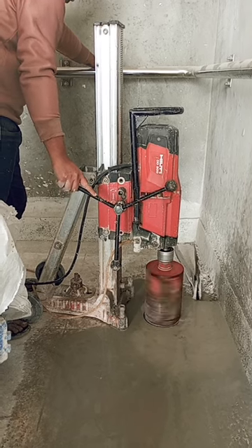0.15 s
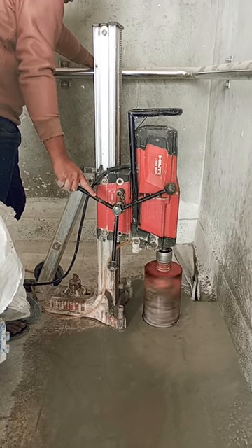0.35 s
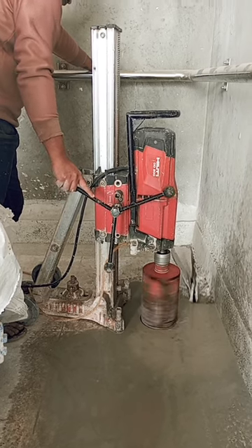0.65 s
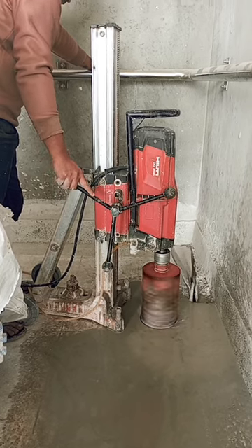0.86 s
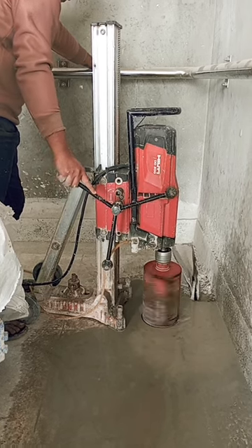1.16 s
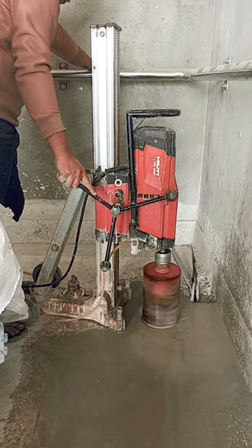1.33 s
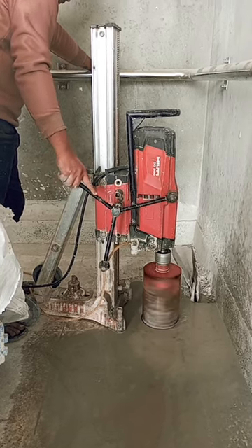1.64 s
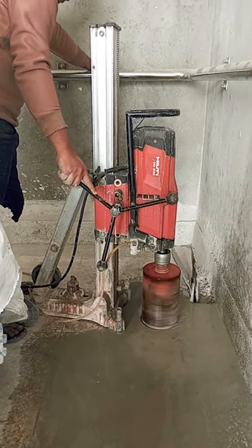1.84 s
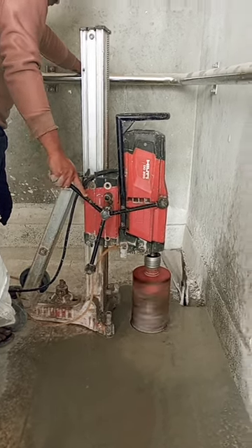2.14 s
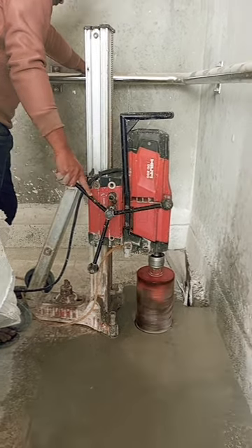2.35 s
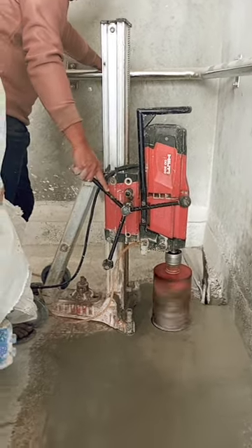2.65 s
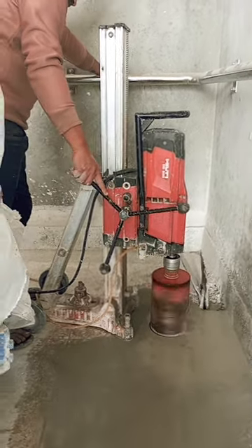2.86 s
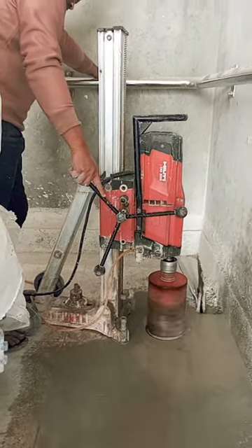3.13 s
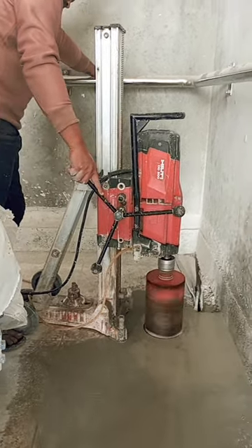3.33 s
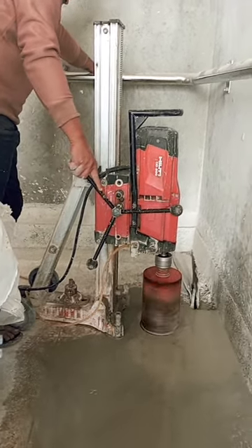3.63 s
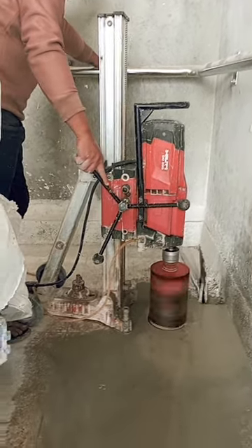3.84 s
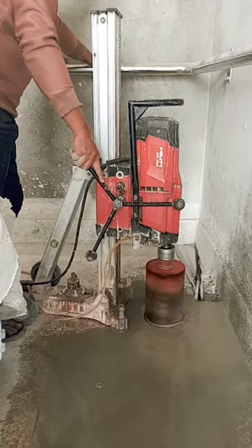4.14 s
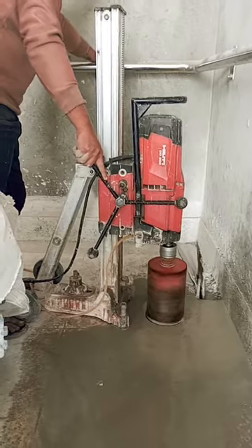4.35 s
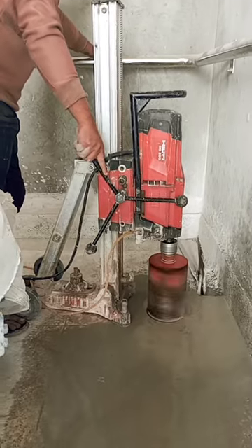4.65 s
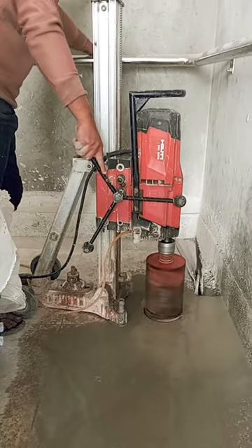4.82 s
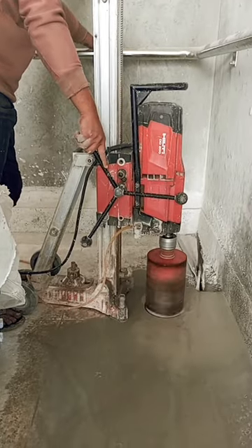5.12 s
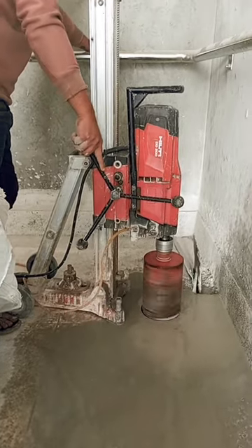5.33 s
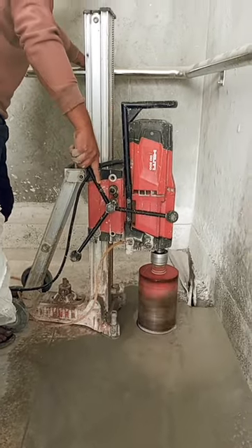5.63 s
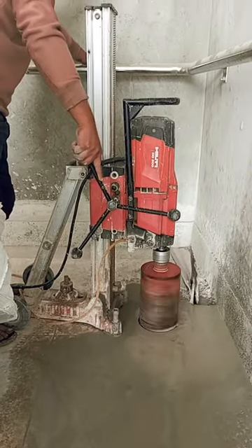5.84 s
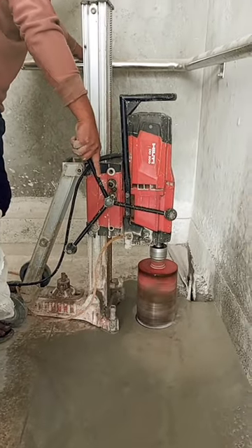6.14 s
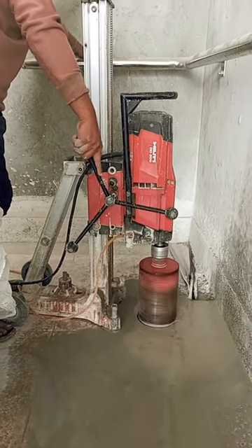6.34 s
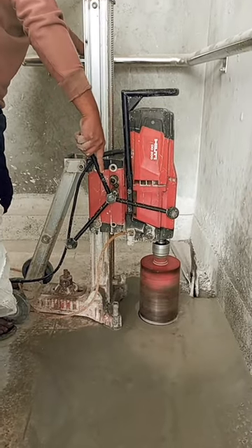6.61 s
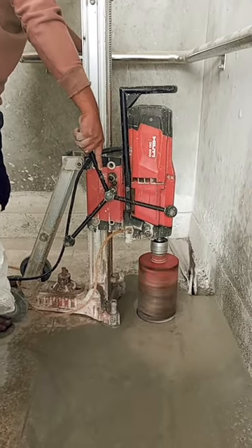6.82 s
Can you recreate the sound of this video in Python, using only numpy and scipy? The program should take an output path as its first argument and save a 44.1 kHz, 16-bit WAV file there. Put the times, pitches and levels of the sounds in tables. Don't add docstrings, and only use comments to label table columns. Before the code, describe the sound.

A core drill is already running at 0 seconds and never stops, heard very close in a small, hard concrete room. Layered gear tones and a piercing commutator whine hold nearly steady, sagging slightly about every quarter second as the bit turns past a tight spot. Beneath lie a dull grinding roar and gritty scrape; above, fan air and wet slurry hiss constantly. A sharp wind pop lands near 0.5, with scattered gusts. From about 2 seconds the high whine swells and fades irregularly between the walls. Pops return around 2.8 and 4.0, then draught thumps and fluttering puffs crowd in from 4.5 onward, especially 5.7 to 6.1. Near 5.5 the cutting presses harder, and by 6 the motor is slightly faster and higher. The scrape gradually dulls while drilling continues to the end at 7 seconds.

```python
import sys
import numpy as np
from scipy import signal
from scipy.fft import rfft, irfft
from scipy.io import wavfile
from scipy.ndimage import uniform_filter1d, minimum_filter1d, map_coordinates

SR = 44100
rng = np.random.default_rng(int(sys.argv[2]) if len(sys.argv) > 2 else 0)


def unload_audio(sound):
    columns = np.transpose(np.atleast_2d(sound))
    steps = np.round(np.clip(columns, -1, 1) * 32767)
    wavfile.write(sys.argv[1], SR, steps.astype(np.int16))


def volts_from_decibels(level):
    exponent = np.asarray(level, float) / 20
    return 10 ** exponent


N = 307818

BIT_RATIO = 84.74
COUNTER = 9 / 69
SECOND = 14 * 9 / 69

# (time [s], speed [Hz])
SHAFT_SPEED = [(0, 329.03), (.26, 329.43), (.52, 330.1), (.78, 330.28), (1.04, 329.96), (1.3, 330.34),
               (1.82, 331.95), (2.08, 332.45), (2.59, 331.94), (3.37, 331.6), (3.89, 332.24),
               (4.15, 332.27), (4.67, 332.69), (5.19, 331.67), (5.45, 331.72), (5.97, 334.06),
               (6.23, 334.37), (6.98, 334.11)]
# (turn [0-1], speed change [Hz])
BIT_SAG = [(.04, .55), (.14, .05), (.2, -.55), (.27, -.97), (.33, -.92), (.45, -.22), (.55, .18),
           (.67, .32), (.83, .29)]
# (shaft order, upper countershaft sideband [dB], lower sideband [dB], flutter [0-1],
# place of the tight spot [turn 0-1], its half width [turn])
STRONG_TONES = [
    (4 * SECOND, -25, -15.5, .17, 0.19, .12),
    (9, -16, -30, .14, 0.4, 0.1),
    (18, -1.5, -19, .28, .3, 0.15),
    (27, -14, -15, .3, 1.2, 0.1),
    (30, -35, -19, 0.44, 0.23, 0.23),
]
# (time [s], running free [dB], tight spot dragging [dB])
SECOND_MESH_4_LEVELS = [(0.0, -37.0, -27.5), (2.07, -39, -28), (2.84, -30, -27), (4.39, -28.5, -29),
                        (4.65, -33, -28), (5.17, -27, -24.0), (6.2, -30.0, -36), (6.72, -30, -23),
                        (6.98, -31.0, -33)]
PINION_LEVELS = [(0.0, -31.0, -45), (1.29, -28.5, -43.0), (1.55, -31.5, -29), (2.33, -26, -29),
                 (3.36, -34.0, -32), (4.65, -34.0, -39), (5.69, -33, -31), (5.95, -41.0, -40),
                 (6.98, -36, -46.0)]
PINION_2_LEVELS = [(0.0, -26.5, -25), (0.52, -35.0, -32), (1.03, -29.5, -30), (1.55, -40.0, -54.0),
                   (2.33, -32.0, -28), (2.59, -21.5, -26), (3.36, -23.5, -22), (4.14, -24.5, -21.0),
                   (4.65, -19.5, -28.0), (5.17, -28, -19.5), (5.43, -25.0, -21.5), (6.98, -23.0, -24.5)]
PINION_3_LEVELS = [(0.0, -54.0, -32.0), (0.78, -24.5, -41.0), (1.55, -36, -31.0), (1.81, -23.0, -38.0),
                   (2.33, -54.0, -35.0), (2.59, -39.0, -27), (2.84, -43.0, -37.0), (3.1, -29, -44.0),
                   (3.88, -20, -26.0), (5.17, -21, -28.0), (5.69, -22, -19), (6.2, -49.0, -28),
                   (6.46, -22, -26), (6.98, -23, -25)]
COMMUTATOR_LEVELS = [(0.0, -19, -40.0), (0.26, -24, -26.0), (0.52, -30.0, -52.0), (1.29, -34, -26),
                     (1.81, -33, -30.0), (2.07, -16, -19.0), (2.33, -22, -23), (2.59, -26, -19.5),
                     (2.84, -28.0, -21.0), (3.1, -22, -21.5), (3.62, -39.0, -28.0), (3.88, -16, -37.0),
                     (4.39, -27.0, -24), (4.91, -16, -21), (5.17, -11.5, -21), (5.69, -31.0, -15.5),
                     (5.95, -17.5, -21), (6.98, -20.0, -36.0)]
# (time [s], level change [dB])
ROOM_CROSSINGS = [(.11, -14), (.15, 6), (.23, -6), (.35, -6), (.88, 14), (1.13, 11), (1.365, 14), (1.96, 4),
                  (2.02, -2), (2.17, -12), (2.28, -12), (2.33, 7), (2.37, -8), (2.46, 5), (2.52, -13),
                  (2.63, 6), (2.9, 8), (2.93, -12), (3.13, 7), (3.24, -5), (3.38, 5), (3.94, -12),
                  (4.12, -2), (4.36, -8), (5.14, -4), (5.43, -8), (5.53, -14), (5.67, 2.5), (5.74, -3),
                  (6.41, -10)]
# (shaft order, level [dB])
HOUSING_SHAFT = [(2, -52), (3, -44), (6, -48), (10, -44), (15, -43), (17, -53), (19, -39), (24, -41),
                 (26, -47), (28, -45)]
# (multiple of the second mesh, level [dB])
HOUSING_MESH = [(1.57, -46.5), (2, -47.5), (3, -41.5), (6, -47)]
# (time [s], unbalance tone [dB], rattle [dB])
HOUSING_DRIFT = [(0, -45.5, 0), (1.3, -44, -2), (2.08, -40.5, -4), (3.1, -46.5, -5.5), (4.67, -41, -8.5),
                 (5.3, -45, -5), (6, -36, -5.5), (6.98, -38.5, -5)]
# (time [s], level [dB])
HAND_FEED = [(0, -.5), (.35, .5), (.58, -1), (1.7, 1), (2.35, -0.5), (4.6, 0), (4.67, -2), (4.76, 0),
             (5.5, 1.8), (6.03, 1.6), (6.1, -0.5), (6.36, 2), (6.98, 1.5)]
# (frequency [Hz], density [dB per Hz])
GRIND_COLOUR = [(150, -40), (250, -12), (835, -7), (1700, -4), (2150, -3.5), (2450, -0.5), (2800, -4.5),
                (3200, -10.5), (4000, -40)]
SCRAPE_COLOUR = [(2500, -16), (3100, -2), (3700, 1), (4300, -2.5), (4900, -3), (5600, -11)]
AIR_COLOUR = [(3600, -48), (4700, -8.5), (5500, -5.5), (6000, -1.5), (6500, -5.5), (7500, -9), (8700, -4),
              (9400, -1.5), (10000, -4), (10800, -12), (12500, -19.5), (15000, -50)]
SLURRY_COLOUR = [(8000, -21), (10300, -10), (11400, -13.5), (12600, -26), (14000, -21.5), (16500, -28)]
# (time [s], level [dB])
STEADY_DRAUGHT = [(0, -37), (1.3, -39.5), (2.1, -36.5), (2.5, -35), (3.6, -38), (4.4, -35), (5.6, -34),
                  (6.98, -32.5)]
# (time [s], half length [s], rise of the low buffet [dB], rise of the sharp part [dB])
FAN_GUSTS = [(.45, .04, 3, 4), (.535, .02, 4, 8), (.83, 0.13, 4, -3), (1.314, 0.027, 8, -2),
             (1.518, .04, 5, 3), (2.05, .13, 2.5, 4), (2.803, 0.018, 5, 12), (2.89, 0.022, 7, 9),
             (3.0, 0.054, 1, 4), (3.697, .03, 7, 4), (3.824, .03, 7, 7), (4.03, 0.094, 6.5, 11),
             (4.56, .035, 4, 11), (4.65, 0.034, -2, 12), (4.69, .02, 7, 3), (4.74, .015, 6, 1.5),
             (4.8, .07, 10, 8), (4.995, .035, 3, 15), (5.092, .035, 3, 13), (5.22, .03, 6, 5),
             (5.32, .07, 5, 14), (5.823, 0.11, -1, 7), (6.058, 0.11, 1.5, 10.5), (6.34, .03, 4, 8),
             (6.418, 0.026, 6, 1.5), (6.562, 0.038, 0, 5), (6.916, .05, 5, 5)]
# (frequency [Hz], density [dB per Hz])
BUFFET_COLOUR = [(20, -27), (45, -14), (75, -1), (150, 0.5), (300, -8), (600, -19), (1200, -60)]
GUST_COLOUR = [(100, -29), (250, -1), (500, -3.5), (900, -6), (1500, -15), (3000, -58)]
# (time [s], peak level [dB])
MIC_POPS = [(0.531, -8.5), (2.791, -16), (2.886, -12), (3.82, -17), (3.989, -16), (4.036, -9), (4.571, -5),
            (4.644, -4), (4.786, -15), (5.095, -10), (5.218, -11), (5.336, -16), (5.377, -15), (5.565, -13),
            (5.705, -7), (5.795, -9), (5.823, -6), (5.925, -7), (6.08, -9), (6.101, -14), (6.337, -11),
            (6.568, -14), (6.643, -9), (6.914, -13)]
# (time [s], low edge [Hz])
STEREO_FLICKS = [(.012, 5000), (.313, 8200), (.464, 6200), (.464, 13500), (.824, 9600), (1.08, 4200),
                 (1.08, 8200), (1.254, 11100), (1.718, 11000), (1.846, 13000), (1.916, 6200), (1.985, 4400),
                 (2.101, 13000), (2.357, 11000), (2.775, 6800), (3.448, 6200), (3.913, 4200), (3.913, 6200),
                 (4.946, 7800), (5.817, 7500), (6.316, 10300)]


def unit(x):
    return x / np.sqrt(np.mean(x ** 2) + 1e-20)


def curves(rows):
    s, *columns = np.transpose(rows)
    return [np.interp(np.arange(N) / SR, s, column) for column in columns]


def wobble(rate):
    knots = rng.standard_normal(int(N * rate / SR) + 4)
    return map_coordinates(knots, [np.arange(N) * rate / SR])


def swells(times, half_s):
    distance_s = np.arange(N) / SR - np.reshape(times, (-1, 1))
    return np.exp(-(distance_s / np.reshape(half_s, (-1, 1))) ** 2)


def rush(spectrum, patchy_db):
    hz, _, z = signal.stft(rng.standard_normal(N + 4096), SR, nperseg=2048, noverlap=1536)
    patches = uniform_filter1d(rng.standard_normal(z.shape), size=16, axis=0)
    patches = unit(uniform_filter1d(patches, size=6, axis=1))
    f, level = np.transpose(spectrum)
    colour_db = np.interp(np.log(hz + 1), np.log(f), level, left=-120, right=-120)
    z = z * volts_from_decibels(colour_db[:, None] + patchy_db * patches)
    return unit(signal.istft(z, nperseg=2048, noverlap=1536)[1][:N])


def tone(order, angle, flutter, rate):
    quick = wobble(rate) + 1j * wobble(rate)
    quick = quick - uniform_filter1d(quick.real, size=SR // 6)
    start = rng.uniform(0, 2 * np.pi)
    return np.sqrt(2) * (1 + flutter * quick) * np.exp(1j * (order * angle + start))


def motor():
    speed, = curves(SHAFT_SPEED)
    bit_turn = np.cumsum(speed) / SR / BIT_RATIO
    speed = speed + np.interp(bit_turn, *np.transpose(BIT_SAG), period=1)
    return 2 * np.pi * np.cumsum(speed) / SR, bit_turn


def gears_and_commutator(angle, bit_turn):
    s, change_db = np.transpose(ROOM_CROSSINGS)
    crossing = volts_from_decibels(change_db @ swells(s, half_s=.022))
    levels = SECOND_MESH_4_LEVELS, PINION_LEVELS, PINION_2_LEVELS, PINION_3_LEVELS, COMMUTATOR_LEVELS
    out = 0
    for (order, upper_db, lower_db, flutter, place, width), rows in zip(STRONG_TONES, levels):
        free, dragging = curves([(s, volts_from_decibels(free_db), volts_from_decibels(drag_db)) for s, free_db, drag_db in rows])
        tight = np.exp(-(((bit_turn - place + .5) % 1 - .5) / width) ** 2)
        strength = free + tight * (dragging - free)
        if order == 30:
            strength = strength * crossing
        upper = volts_from_decibels(upper_db - 2.0) * (1 - .8 * tight) * tone(COUNTER, angle, 0.27, 14)
        lower = volts_from_decibels(lower_db - 2.5) * tone(-COUNTER, angle, 0.89, 22)
        out = out + strength * (1 + upper + lower) * tone(round(order, 4), angle, flutter, 30)
    return out.real


def housing(angle):
    unbalance_db, rattle_db = curves(HOUSING_DRIFT)
    out = volts_from_decibels(unbalance_db - 0.5) * tone(1, angle, 0.64, 32)
    for order, db in HOUSING_SHAFT + [(k * SECOND, db) for k, db in HOUSING_MESH]:
        strength = volts_from_decibels(db + rattle_db * 0.89 + .8 * wobble(2.64))
        out += strength * tone(round(order, 4), angle, 1.33, 40)
    return out.real


def grinding(feed_db):
    return volts_from_decibels(-26 + feed_db + 0.41 * wobble(8)) * rush(GRIND_COLOUR, patchy_db=2.0)


def scraping(feed_db):
    sinking_db = 0.6 * (np.arange(N) - N / 2) / SR
    level_db = -28.5 + 1.1 * feed_db - sinking_db + 0.6 * wobble(8)
    return volts_from_decibels(level_db) * rush(SCRAPE_COLOUR, patchy_db=1.5)


def cooling_air(feed_db):
    return volts_from_decibels(-18 + 0.73 * feed_db + 0.55 * wobble(8)) * rush(AIR_COLOUR, patchy_db=1.27)


def slurry(feed_db):
    return volts_from_decibels(-27.5 + .9 * feed_db + 0.54 * wobble(6.1)) * rush(SLURRY_COLOUR, patchy_db=.3)


def draught():
    steady_db, = curves(STEADY_DRAUGHT)
    s, half_s, *rise_db = np.transpose(FAN_GUSTS)
    low_db, sharp_db = steady_db + rise_db @ swells(s, half_s)
    sharp_db = sharp_db - 4
    lumps = wobble(35)
    low = volts_from_decibels(low_db + 0.46) * unit(volts_from_decibels(1.94 * lumps) * rush(BUFFET_COLOUR, patchy_db=0.5))
    gust_db = 1.44 * (sharp_db + 34) - 35.5
    flutter = volts_from_decibels(1.8 * lumps + 4.5 * wobble(260))
    return low + volts_from_decibels(gust_db) * unit(flutter * rush(GUST_COLOUR, patchy_db=1.0))


def pops():
    out, t = np.zeros(N + SR), np.arange(-200, 900) / SR
    dip = np.exp(-(t / 0.00042) ** 2)
    rebound = 0.19 * np.exp(-((t - .0024) / 0.0013) ** 2)
    rebound -= 0.092 * np.exp(-((t - .007) / 0.0028) ** 2)
    for s, db in MIC_POPS:
        out[round(s * SR) - 200:][:len(t)] += volts_from_decibels(db - 2.0) * (rebound - dip)
    return out[:N]


def scene():
    angle, bit_turn = motor()
    feed_db, = curves(HAND_FEED)
    drill = gears_and_commutator(angle, bit_turn) + housing(angle)
    cut = grinding(feed_db) + scraping(feed_db)
    hiss = cooling_air(feed_db) + slurry(feed_db)
    return np.tile(drill + cut + hiss + draught() + pops(), (2, 1))


def band(x, low_hz, high_hz):
    hz = np.fft.rfftfreq(len(x), 1 / SR)
    return irfft(rfft(x) / (1 + (low_hz / (hz + 1)) ** 4) / (1 + (hz / high_hz) ** 24), len(x))


def compress_and_limit(x):
    treble = band(x, low_hz=3040, high_hz=10400)
    level_db = 10 * np.log10(np.abs(uniform_filter1d(treble ** 2, size=300)) + 1e-9)
    x = x + treble * (volts_from_decibels(-.36 * (level_db + 14.0).clip(-6, 9)) - 1)
    needed = np.minimum(1, 0.61 / (np.abs(x) + 1e-9))
    return x * uniform_filter1d(minimum_filter1d(needed, size=61), size=61)


def flicks(x):
    side, fade, hz = np.zeros(N + SR), signal.windows.tukey(2048, .7), np.fft.rfftfreq(2048, 1 / SR)
    for s, low_hz in STEREO_FLICKS:
        start = round(s * SR)
        inside = (hz > low_hz) * (hz < 1.23 * low_hz)
        noise = irfft(rfft(rng.standard_normal(2048)) * inside)
        own = irfft(rfft(x[start:][:2048]) * inside).std()
        side[start:][:2048] += volts_from_decibels(-5) * own * fade * unit(noise)
    return side[1024:N + 1024]


def roll_off(x):
    return signal.sosfilt(signal.butter(12, 15710, fs=SR, output="sos"), x)


def record(dry):
    x = compress_and_limit(band(dry[0], low_hz=38, high_hz=SR))
    side = flicks(x)
    return roll_off(np.array([x + side, x - side]))


dry = scene()
out = record(dry)
unload_audio(out)
```